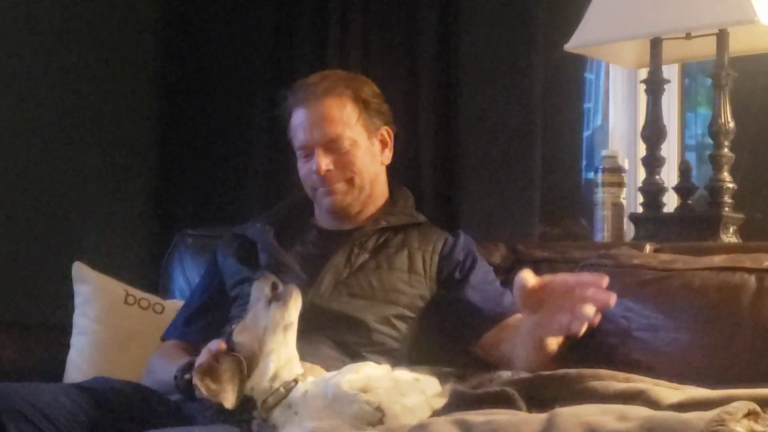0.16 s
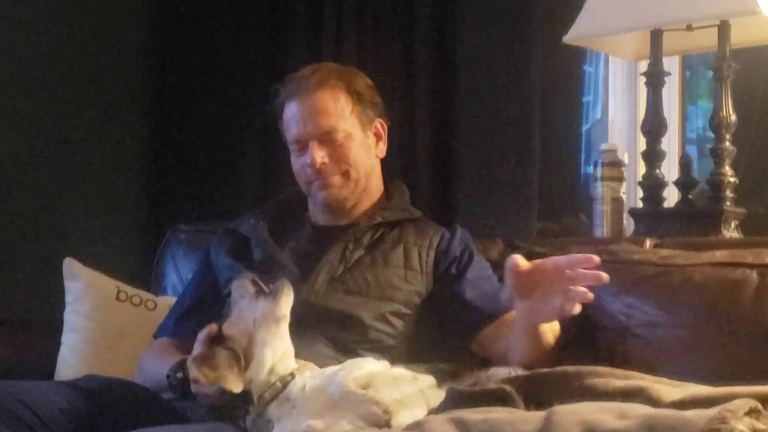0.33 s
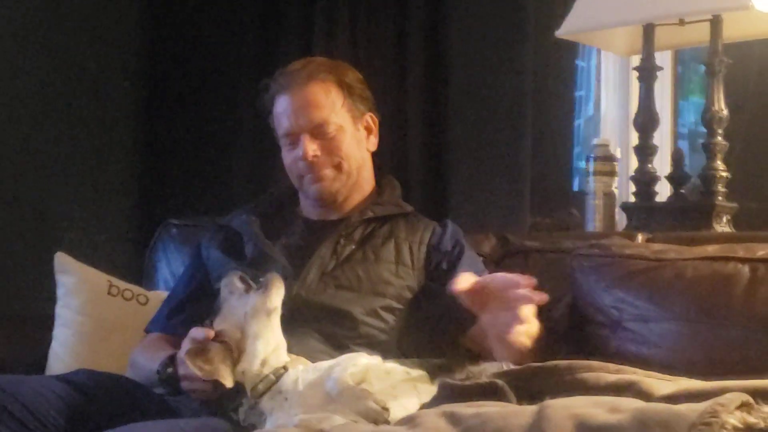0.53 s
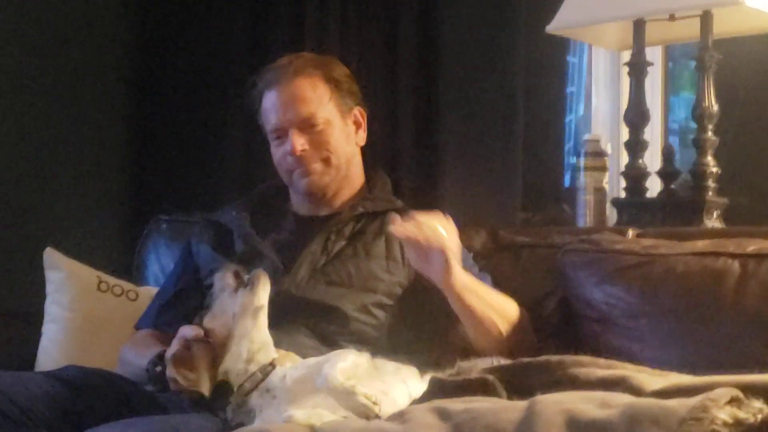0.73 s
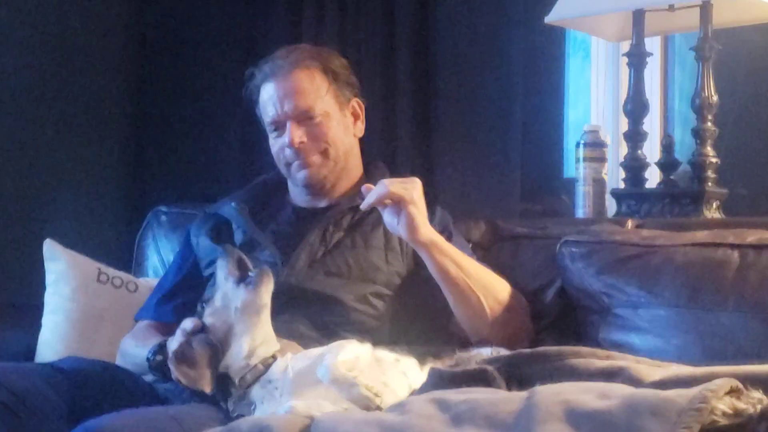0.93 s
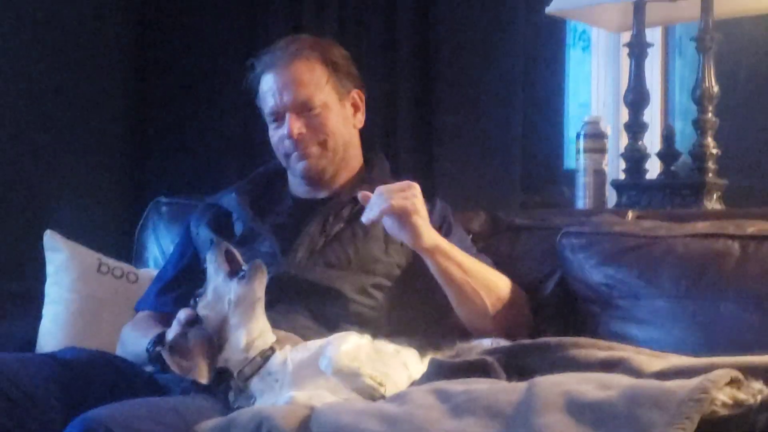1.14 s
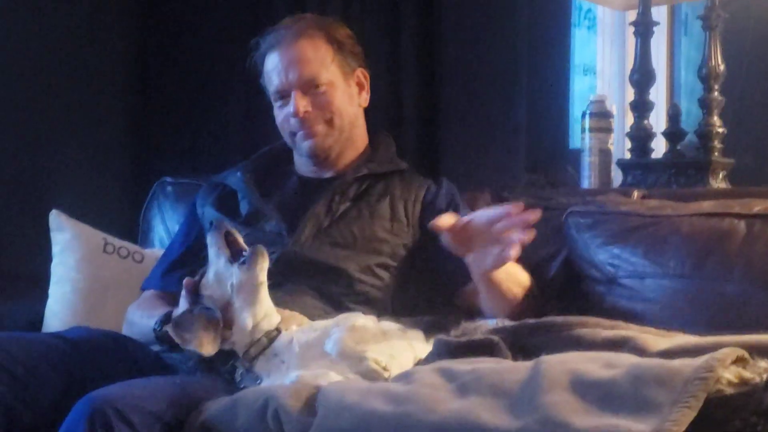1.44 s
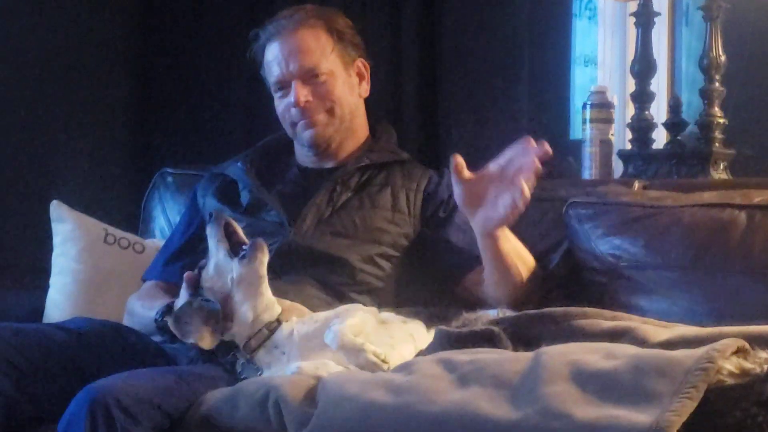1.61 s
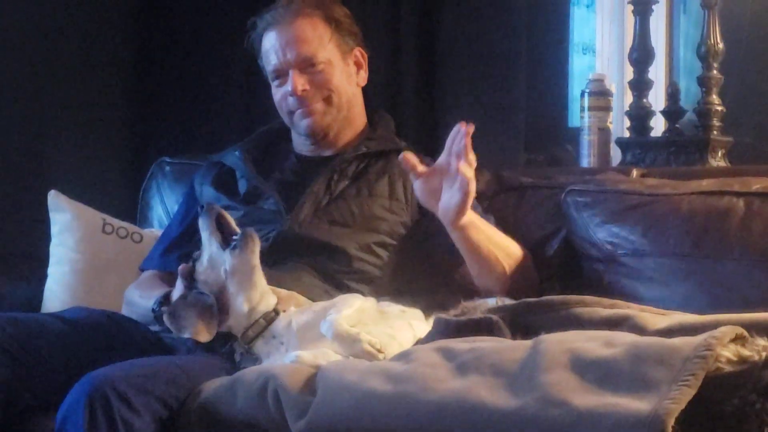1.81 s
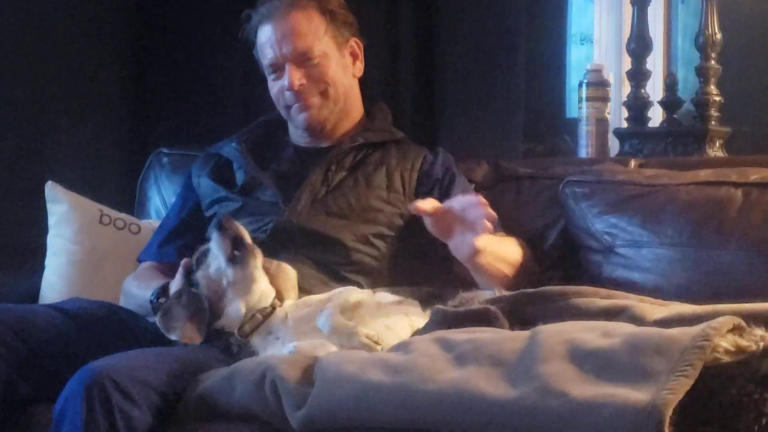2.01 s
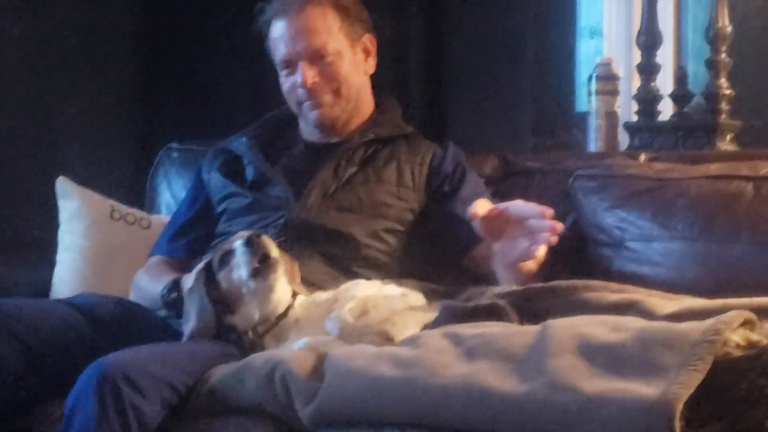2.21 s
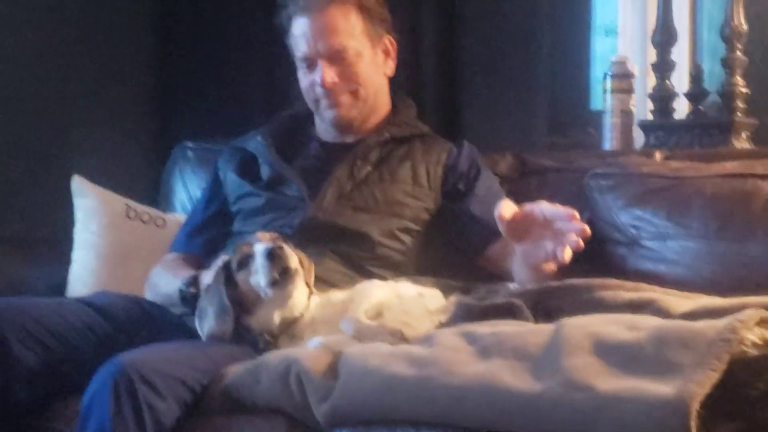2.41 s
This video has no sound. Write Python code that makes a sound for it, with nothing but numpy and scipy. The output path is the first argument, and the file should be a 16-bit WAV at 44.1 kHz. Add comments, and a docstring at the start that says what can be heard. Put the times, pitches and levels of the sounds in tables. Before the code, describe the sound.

A dog howls indoors, slightly left of centre. From 0 s the note swells, raspy, cracking around 0.3 s, with thin high whines until about 0.8 s. It wavers, breaks downward near 1 s, steadies and clears, turns gravelly around 1.4-1.5 s, jumps up near 1.6 s and ends at 2.1 s. Room echo fades over faint rumble, hum and soft rustles; a quiet new note starts at 2.4 s.

```python
"""A dog howls in a living room: one long wavering note that breaks between two registers and briefly turns
gravelly, then the soft start of the next. Harmonics of one unsteady pitch carry it, with rasp and hiss from
noise. Short whines, often higher, are gliding harmonic tones. The room answers with echoes and decaying noise.
Underneath lie a noise rumble, a sine for the mains hum, and soft low rustles made of swelling noise."""
import sys
import numpy as np
from scipy import signal
from scipy.fft import rfft, irfft, next_fast_len
from scipy.io import wavfile
from scipy.ndimage import map_coordinates

SR = 44100
rng = np.random.default_rng(int(sys.argv[2]) if len(sys.argv) > 2 else 0)


def put_to_file(sound):
    """Save the sound as 16-bit audio at rate SR, in the file named by the first command-line argument."""
    columns = np.atleast_2d(sound).T  # one column per channel
    safe = np.clip(columns, -1, 1)
    whole_steps = np.round(safe * 32767)
    wavfile.write(sys.argv[1], SR, whole_steps.astype(np.int16))


N = 112454
TOP_HZ = 15850  # upper band limit


def amp(db):
    """Level definition: decibels to an amplitude ratio."""
    return 10 ** (np.asarray(db) / 20)


def unit(x):
    """Normalisation: scale to rms 1."""
    return x / np.sqrt(np.mean(x ** 2) + 1e-20)


def along(points, hz):
    """Logarithmic frequency scale: interpolate (f, value) points along log f."""
    f, value = np.transpose(points)
    return np.interp(np.log(hz + 1), np.log(f + 1), value)


def clock():
    """Sampling: the time of each sample in seconds."""
    return np.arange(N) / SR


def curves(rows):
    """Linear interpolation: one value per sample for each column after the time."""
    times, *columns = np.transpose(rows)
    return [np.interp(clock(), times, column) for column in columns]


def wobble(rate):
    """Band-limited fluctuation: a smooth random curve through rate knots a second."""
    knots = rng.standard_normal(int(N * rate / SR) + 4)
    return map_coordinates(knots, [clock() * rate])


def gate(start, end, rise, fall):
    """Amplitude envelope: sine-squared rise, hold and fall between two times, all in seconds."""
    t = clock()
    ramp = np.minimum((t - start) / rise, (end - t) / fall)
    return np.sin(np.pi / 2 * np.clip(ramp, 0, 1)) ** 2


def filtered(x, response):
    """Linear filtering: multiply the spectrum of x by a response of frequency."""
    m = next_fast_len(N + SR // 2)  # padded against wrap-around
    spectrum = rfft(x, m) * response(np.fft.rfftfreq(m, 1 / SR))
    return irfft(spectrum, m)[..., :N]


def coloured(x, spectrum):
    """Spectral shaping: weight x by a (f, level) curve, then scale to rms 1."""
    return unit(filtered(x, lambda hz: amp(along(spectrum, hz))))


def air(spectrum):
    """Partial coherence: two channels of coloured noise, each part shared and part its own."""
    own = rng.standard_normal((2, N))
    shared = rng.standard_normal(N)
    return coloured(own + shared, spectrum)


# Spectral shape of the room rumble: [f/Hz, relative level/dB per Hz]
RUMBLE_SPECTRUM = [(20, -29), (50, -1.5), (90, -11), (500, -13.5), (2000, -13.5), (4000, -37)]


def rumble():
    """Stationary noise: a steady random floor, strongest near 50 Hz."""
    return amp(-68.5) * air(RUMBLE_SPECTRUM)  # rms level/dB


def hum():
    """Mains hum: a single sinusoid, alike in both channels."""
    HUM_HZ, HUM_DB = 60.3, -72.5  # f/Hz, rms level/dB
    return amp(HUM_DB) * np.sqrt(2) * np.sin(2 * np.pi * HUM_HZ * clock())


# Soft low rustles: [centre t/s, Gaussian width t/s, peak level/dB]
RUSTLES = [(.72, 0.21, -59.5), (2.145, 0.031, -58.5)]
# Spectral shape of the rustles: [f/Hz, relative level/dB per Hz]
CLOTH_SPECTRUM = [(20, -23), (50, 4.5), (90, -2), (170, -5), (400, -8.5), (1500, -27)]


def rustles():
    """Amplitude-modulated noise: low noise swells and sinks under Gaussian envelopes."""
    stir = sum(amp(db) * np.exp(-.5 * ((clock() - centre) / width) ** 2) for centre, width, db in RUSTLES)
    return stir * air(CLOTH_SPECTRUM)


# Reverberation time, the time to decay by 60 dB: [f/Hz, T60 t/s]
ROOM_T60 = [(100, 0.6), (600, 0.45), (1200, 0.54), (2500, 0.48), (6000, 0.43), (15000, 0.17)]


def room(x):
    """Reverberation: discrete early reflections and an exponentially decaying diffuse tail, unlike at each side."""
    TAIL_DB = -1  # tail energy against the direct sound, before the fade-in
    WALLS_DB, ECHOES = -2, 8  # combined level of the echoes against the direct sound, number a side
    WALL_GAP_S = .004  # silence before the tail, and also the length of its fade-in
    noise = rng.standard_normal((2, SR * 3 // 4))
    hz, t, z = signal.stft(noise, SR, nperseg=256)
    t60 = along(ROOM_T60, hz)[:, None]
    decaying = z * amp(-60 * t / t60) / np.sqrt(t60)  # equal energy at every frequency
    response = signal.istft(decaying, SR, nperseg=256)[1]
    t = np.arange(response.shape[1]) / SR
    response = response * np.clip(t / WALL_GAP_S - 1, 0, 1)
    response *= amp(TAIL_DB) / np.sqrt(SR / np.log(10 ** 6))  # energy of the exponential decay
    for side in response:
        arrivals = (rng.uniform(.002, .02, size=ECHOES) * SR).astype(int)
        side[arrivals] += amp(WALLS_DB) * rng.choice([-1, 1], size=ECHOES) / np.sqrt(ECHOES)
    return signal.fftconvolve(x[None], response, axes=1)[:, :N]


# Whines: [start t/s, length t/s, first f/Hz, middle f/Hz, last f/Hz, fundamental level/dB,
# 2nd partial level/dB, 3rd partial level/dB, pitch scatter/share of f]
WHINES = [(0.037, 0.19, 495, 773, 598, -45, -47.5, -73, 0.012),
          (0.07, 0.14, 2120, 2320, 2206, -46.5, -92, -96.5, 0.008),
          (0.106, 0.2, 1507, 1340, 1184, -39.5, -72.5, -97, 0.011),
          (0.268, 0.125, 1950, 2270, 2389, -25, -53, -59, 0.008),
          (0.413, 0.116, 831, 798, 798, -41, -43.5, -65.5, 0.044),
          (0.553, 0.1, 832, 881, 894, -25, -45.5, -65.5, 0.018),
          (0.588, 0.1498, 996.2, 1082, 1011, -29.5, -19, -36.5, 0.0066),
          (0.729, 0.082, 1163, 1200, 1216, -26.5, -36, -50.5, 0.025),
          (1.1, .13, 1022, 756, 641, -38.5, -59.5, -77, 0.06),
          (1.714, 0.17, 1048, 1079, 1024, -31.5, -25, -40.5, 0.0061)]
# Partials from the 4th up, against the 3rd: [f/Hz, level/dB]
WHINE_OVERTONES = [(4200, -28), (6300, -13.5), (8500, -28.5), (11000, -17.5), (15500, -37)]


def whines():
    """Frequency modulation: thin harmonic tones, each following a parabolic arc of pitch with random scatter."""
    FADE_S = 0.037
    out = np.zeros(N)
    for start, length, first, middle, last, *partial_db, scatter in WHINES:
        progress = np.clip((clock() - start) / length, 0, 1)
        arc = np.polyfit([0, .5, 1], [first, middle, last], 2)
        pitch = np.polyval(arc, progress) * (1 + scatter * wobble(260))
        phase = 2 * np.pi * np.cumsum(pitch) / SR
        overtones = [partial_db[-1] + along(WHINE_OVERTONES, k * middle) for k in range(4, 15)]
        tone = np.zeros(N)
        for k, db in enumerate(partial_db + overtones, 1):
            if k * middle < TOP_HZ:
                tone += amp(db) * np.sin(k * phase)
        out += np.sqrt(2) * tone * gate(start, start + length, FADE_S, FADE_S)
    return out


# Treble of the long note, before the muzzle trim: [t/s, low band level/dB, middle level/dB, high level/dB]
TREBLE = [(0.1, -89.5, -80, -81), (0.291, -50.5, -51.5, -59.5), (0.389, -41, -43.5, -53.5),
          (0.54, -72, -48, -61.5), (0.68, -61, -42, -55.5), (0.79, -60.5, -51, -59),
          (0.97, -48.5, -48, -57.5), (1.141, -54, -43.5, -60.5), (1.279, -57.5, -51, -63.5),
          (1.519, -60.5, -47.5, -61), (1.7, -62, -50.5, -61), (1.789, -58.5, -49.5, -53),
          (2.1, -73.5, -61.5, -72.5)]
# The same for the next note: [t/s, low band level/dB, middle level/dB, high level/dB]
NEXT_TREBLE = [(2.441, -94, -71, -76.5)]
# Upper muzzle resonances: [lower edge f/Hz, upper edge f/Hz, trim of the direct sound level/dB]
MUZZLE = [(4130, 4760, -2.5), (5610, 7810, -1), (9600, 14000, 1)]


def treble(phase, pitch, hoarse):
    """Source-filter principle: high partials and hiss puffed once a cycle excite the muzzle resonances."""
    PATCHY_DB = 4  # swing of each high partial
    HISS_HZ = 8000  # partials weaken above this, leaving more of the hiss
    HISS_DB, HISS_GROWS = -8, .7  # hiss against the partials at mean hoarseness, growth in dB per dB
    CLOSURE_DB = 3.2  # fast random swing of the whole treble
    ladder = np.zeros(N)
    for k in range(7, 30):
        rolloff = np.sqrt(1 + (k * pitch / HISS_HZ) ** 2)
        ladder += amp(PATCHY_DB * wobble(22)) * np.cos(k * phase) / rolloff
    hiss = unit(rng.standard_normal(N) * (1 + np.cos(phase)) ** 2)
    breathy = amp(HISS_DB) * (hoarse / hoarse.mean()) ** HISS_GROWS
    source = (unit(ladder) + breathy * hiss) / np.sqrt(1 + breathy ** 2)
    source *= amp(CLOSURE_DB * wobble(400))
    out = np.zeros(N)
    for (low, high, trim), db in zip(MUZZLE, curves(list(TREBLE) + list(NEXT_TREBLE))):
        band = signal.butter(N=3, Wn=[low, high], btype="bandpass", fs=SR, output="sos")
        out += amp(db + trim) * unit(signal.sosfilt(band, source))
    return out


# Spectral shape of the rasp: [f/Hz, relative level/dB]
RASP_SPECTRUM = [(100, -34.5), (420, -62.5), (560, 0), (900, -6), (1250, -1.5), (1500, -7.5), (2200, 5.5),
                 (2700, -12.5), (3300, -8.5), (3800, -38)]


def rasp(phase, effort, hoarse):
    """Modulated turbulence: noise puffed once a cycle, sputtering at random, follows effort and hoarseness."""
    RASP_DB, SPUTTER_DB = -1.5, 4.5  # level against the hoarseness, depth of the sputter
    puffs = (1 + np.cos(phase)) * amp(SPUTTER_DB * wobble(110))
    return amp(RASP_DB) * effort * hoarse * coloured(rng.standard_normal(N) * puffs, RASP_SPECTRUM)


# Gravelly stretch: (start t/s, end t/s, amplitude depth 0-1, phase swing/rad, drift of the slow cycle/rad)
GRAVEL = (1.39, 1.526, 0.38, 0.063, 0.14)


def gravel(phase):
    """Subharmonic modulation: a cycle four times slower than the pitch sways phase and amplitude."""
    start, end, depth, swing, drift = GRAVEL
    slow_phase = phase / 4 + drift * wobble(80)
    slow_cycle = np.sin(slow_phase) + 0.53 * np.sin(2 * slow_phase)
    slow_cycle = gate(start, end, 0.014, 0.05) * slow_cycle
    return swing * slow_cycle, 1 + depth * slow_cycle


# Low partials of the long note, before the low cut:
# [t/s, 1st level/dB, 2nd level/dB, 3rd level/dB, 4th level/dB, 5th and 6th base level/dB]
LEVELS = [(0.0, -43, -55, -62, -88.5, -86), (0.07, -49, -63.5, -77, -74, -82),
          (0.11, -37, -44, -41, -48.5, -69), (0.22, -36.5, -33.5, -34.5, -37, -46),
          (0.29, -32.5, -28.5, -23.5, -30.5, -34.5), (0.32, -41, -32, -28.5, -26, -29.5),
          (0.38, -30.5, -20, -29.5, -31, -26.5), (0.51, -35, -22, -35, -27, -43.5),
          (0.7, -40, -23.5, -28, -25.5, -41), (0.82, -32.5, -24, -37, -35, -35),
          (1.07, -34.5, -27.5, -29, -24, -36), (1.38, -36, -24, -32.5, -27, -43),
          (1.45, -42.5, -27, -43, -29, -39.5), (1.54, -37, -26.5, -29, -21.5, -39.5),
          (1.59, -32.5, -23.5, -40, -36, -49.5), (1.65, -31.5, -17, -27.5, -32, -34.5),
          (1.72, -32.5, -36, -51.5, -40, -32.5), (1.78, -31.5, -20, -35.5, -33, -38),
          (1.9, -39, -27, -39, -32.5, -40.5), (1.98, -28.5, -23, -29.5, -32.5, -43),
          (2.12, -35.5, -34, -51, -50.5, -67)]
# The same columns for the next note: [t/s, 1st, 2nd, 3rd, 4th, 5th and 6th base level/dB]
NEXT_LEVELS = [(2.439, -47, -51, -66, -49.5, -73), (2.54, -35, -44.5, -53, -44, -69)]


def partial_levels():
    """Spectral envelope: gain curves of partials 1 to 4 and the shared base of 5 and 6."""
    return [amp(db) for db in curves(list(LEVELS) + list(NEXT_LEVELS))]


# Throat colour of the 5th and 6th partials: [f/Hz, level/dB]
THROAT = [(2600, 0), (3050, -8), (3350, -10), (3650, -28)]


def low_partials(phase, pitch, hoarse, bands):
    """Harmonic series: six partials, each blurred by random sidebands that grow with hoarseness."""
    SIXTH_DB, BLUR_DB = -5, -5  # extra level of the 6th partial, blur against the hoarseness
    voice = np.zeros(N)
    for k in range(1, 7):
        if k < 5:
            level = bands[k - 1]
        else:
            level = bands[4] * amp(along(THROAT, k * pitch) + SIXTH_DB * (k == 6))
        blur = amp(BLUR_DB) * hoarse * (wobble(240) + 1j * wobble(240))
        voice += np.sqrt(2) * level * np.real((1 + blur) * np.exp(1j * k * phase))
    return voice


# Pitch of the howl, its sudden steps being voice breaks: [t/s, f/Hz]
PITCH = [(0, 499), (.09, 537), (.16, 539.2), (.215, 571), (.272, 653.7), (.284, 528.6), (.32, 570.6),
         (.375, 606.9), (.44, 594.7), (.55, 568.2), (.66, 543.2), (.735, 526.3), (.772, 551.8),
         (.79, 596.6), (.84, 617.2), (.91, 581.7), (.968, 643.6), (.982, 520), (1.11, 545.3), (1.25, 520),
         (1.38, 544.4), (1.56, 552.3), (1.58, 603.5), (1.63, 598.6), (1.71, 626.4), (1.77, 611.6),
         (1.87, 583.5), (1.98, 602.5), (2.03, 565.7), (2.11, 561), (2.42, 521), (2.475, 507), (2.54, 517)]
# Hoarseness, the reference for rasp, blur and unsteadiness: [t/s, noise against the voice level/dB]
HOARSE = [(0, -16), (.13, -10.5), (.2, -17), (.29, -9), (.4, -15), (.55, -20), (.7, -17.5), (.77, -10),
          (.85, -21.5), (.98, -8), (1.06, -24.5), (1.3, -31.5), (1.43, -21.5), (1.53, -26), (1.58, -20),
          (1.68, -28), (1.88, -26), (2.1, -26.5), (2.44, -15), (2.48, -27.5)]
# Extent of the notes: [start t/s, end t/s]
NOTES = [(0.0, 2.125), (2.431, 2.6)]


def howl():
    """Vocal fold oscillation: one unsteady pitch drives all partials, with noise from hoarseness."""
    FLUTTER, JITTER = .002, .003  # slower and faster pitch scatter, shares of f
    SHIMMER_DB, LOW_CUT_HZ = .6, 563
    ATTACK_S, RELEASE_S = 0.002, 0.022
    pitch, = curves(PITCH)
    hoarse = amp(curves(HOARSE)[0])
    relative_hoarse = hoarse / hoarse.mean()
    pitch = pitch * (1 + FLUTTER * wobble(44.9) + JITTER * relative_hoarse * wobble(350))
    phase = 2 * np.pi * np.cumsum(pitch) / SR
    phase_sway, gravel_gain = gravel(phase)
    phase = phase + phase_sway
    bands = partial_levels()
    voice = low_partials(phase, pitch, hoarse, bands) + treble(phase, pitch, hoarse)
    voice *= gravel_gain * amp(SHIMMER_DB * np.sqrt(relative_hoarse) * wobble(170))
    low_cut = signal.butter(N=10, Wn=LOW_CUT_HZ, btype="highpass", fs=SR, output="sos")
    voice = signal.sosfilt(low_cut, voice)
    effort = np.sqrt(sum(band ** 2 for band in bands))
    notes = sum(gate(start, end, ATTACK_S, RELEASE_S) for start, end in NOTES)
    return (voice + rasp(phase, effort, hoarse)) * notes


# Level difference between the channels: [f/Hz, left minus right level/dB]
BALANCE = [(500, -0.5), (1100, 2.5), (2200, 0), (9000, 0)]


def scene():
    """Interaural-style cues: level and time differences place the dog a little to the left, in the room."""
    MIC_LAG_S = .00005  # the right channel lags the left

    def ports(hz):
        """Stereo transfer function: half of each difference goes to either channel."""
        gain = amp(np.outer([.5, -.5], along(BALANCE, hz)))
        return gain * np.exp(1j * np.pi * np.outer([1, -1], hz) * MIC_LAG_S)

    dog = howl() + whines()
    return filtered(dog + room(dog), ports) + rumble() + rustles() + hum()


def record(dry):
    """Band limitation: only frequencies below the upper limit pass."""
    return filtered(dry, lambda hz: hz < TOP_HZ)


dry = scene()
out = record(dry)
put_to_file(out)
```